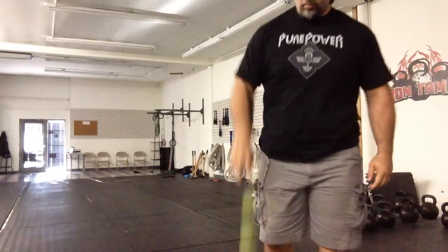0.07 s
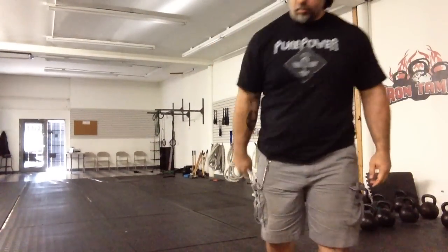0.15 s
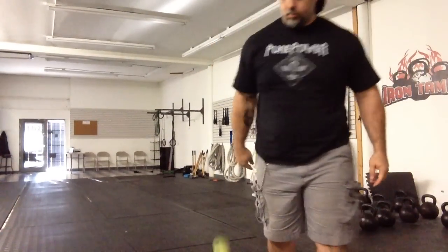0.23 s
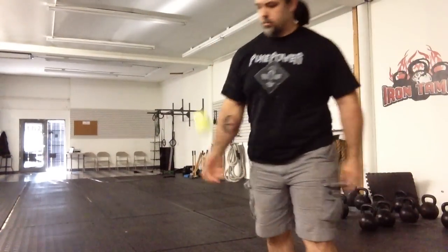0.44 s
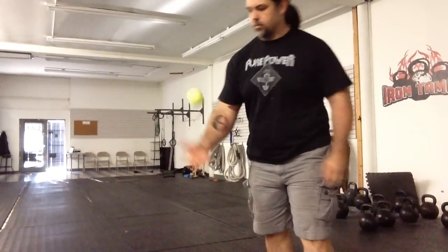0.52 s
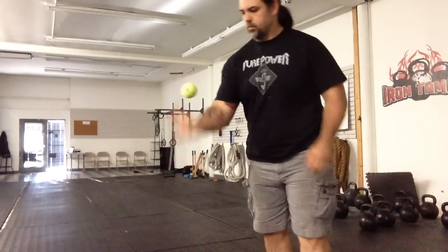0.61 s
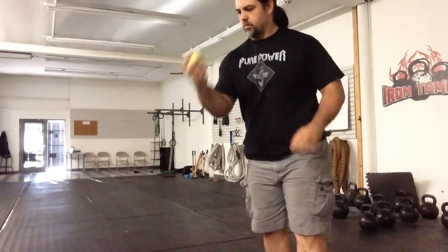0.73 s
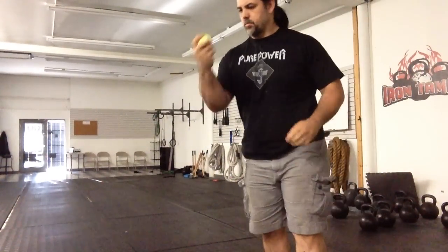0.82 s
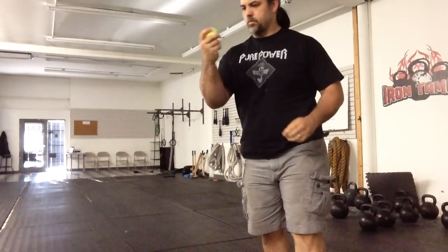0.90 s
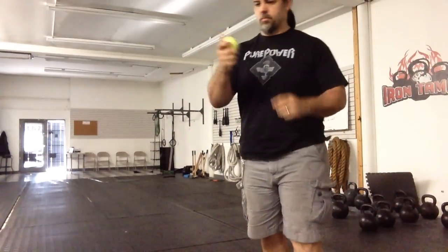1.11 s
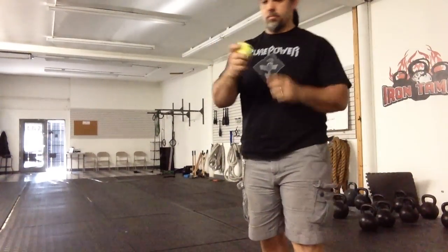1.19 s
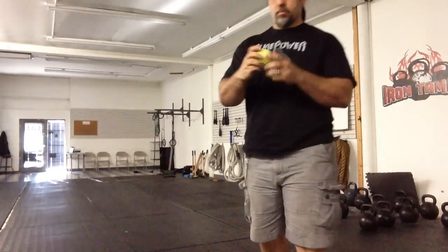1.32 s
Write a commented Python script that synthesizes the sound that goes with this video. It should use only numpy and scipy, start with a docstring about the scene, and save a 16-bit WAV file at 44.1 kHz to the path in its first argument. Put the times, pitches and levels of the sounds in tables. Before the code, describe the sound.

One sharp, hollow tennis ball bounce rings out in a gym, then a faint catch.

```python
"""A large, bare gym hums faintly. A sleeve swishes and a hand brushes a tennis ball, throwing it down.
After a faint tick the ball hits the rubber floor at 0.22 s: the felt slaps, the shell thumps and rings.
Near surfaces throw the bounce back, then the hall rings on, its treble dying first.
The sleeve swishes again, the ball taps the catching hand at 0.75 s, and a soft bump follows."""
import sys
import numpy as np
from scipy import signal
from scipy.fft import rfft, irfft
from scipy.io import wavfile
from scipy.ndimage import uniform_filter1d

SR = 44100
rng = np.random.default_rng(int(sys.argv[2]) if len(sys.argv) > 2 else 0)


def wav_record(signal):
    """Record a signal, one row per channel, as 16-bit PCM in the file named by sys.argv[1]."""
    frames = np.transpose(np.atleast_2d(signal))
    bounded = np.clip(frames, -1, 1)
    # unit amplitude maps onto the largest positive 16-bit level
    quanta = np.round(bounded * 32767).astype(np.int16)
    wavfile.write(sys.argv[1], SR, quanta)


N = 59535
T = np.arange(N) / SR
HZ = np.fft.rfftfreq(2 * N, 1 / SR)
BOUNCE_S = 0.2177


def amp(db):
    """Decibels to gain."""
    return 10 ** (np.asarray(db) / 20)


def unit_rms(x):
    """Scale to rms 1."""
    return x / np.sqrt(np.mean(x ** 2) + 1e-20)


def spectrum(points):
    """Interpolate (freq_hz, value) rows onto HZ, on a log-frequency axis."""
    freq_hz, value = np.transpose(points)
    return np.interp(np.log(HZ + 1), np.log(freq_hz + 1), value)


def noise(colour_db):
    """Steady coloured noise, rms 1."""
    return unit_rms(irfft(rfft(rng.standard_normal(2 * N)) * amp(colour_db))[:N])


def burst(start_s, level_db, colour_db, decay_s):
    """Noise with instant onset and exponential decay."""
    envelope = (T >= start_s) * np.exp(-np.maximum(T - start_s, 0) / decay_s)
    return amp(level_db) * noise(colour_db) * envelope


def ring(modes, age_s):
    """Decaying sines, struck at age 0."""
    t = np.maximum(age_s, 0)
    return sum(amp(db - 60 * t / t60_s) * np.sin(2 * np.pi * hz * t) for hz, db, t60_s in modes)


def click(colour_db):
    """Minimum-phase impulse: the sharpest causal click of this colour."""
    cepstrum = irfft(np.log(amp(colour_db)))
    cepstrum[1:N] *= 2
    cepstrum[N + 1:] = 0
    return irfft(np.exp(rfft(cepstrum)))[:N]


def delayed(x, delay_s, gain=1):
    """Delay with a gain per frequency."""
    return irfft(rfft(x, 2 * N) * gain * np.exp(-2j * np.pi * HZ * delay_s))[:N]


def room_tone():
    """Faint, steady hum of the room: bass-heavy noise."""
    # room noise spectrum: freq_hz, relative_db
    colour = [(20, 17.5), (45, 11.5), (65, 13), (90, 9), (115, 8.5), (160, -6.5), (350, -6), (750, -7.5),
              (1300, -17.5), (2100, -22), (3500, -32), (6000, -35), (10000, -35), (15000, -34)]
    return amp(-54) * noise(spectrum(colour))


def sleeve():
    """Cloth slides softly with each arm movement."""
    # arm movements: start_s, level_db, tilt_db_per_octave, rise_s, hold_s, release_s
    swishes = [(-.06, -72, -2, 0.037, 0.073, .04), (0.053, -66, 0.5, 0.033, .03, .03),
               (0.107, -68.5, 1.5, 0.049, 0.11, .03), (0.537, -63.5, -.5, 0.059, 0.14, 0.086)]
    # cloth friction spectrum: freq_hz, relative_db
    cloth = [(200, -25.5), (900, 8), (2200, 7.5), (4500, 3), (6500, 0.5), (10000, -0.5), (15000, -4)]
    sound = np.zeros(N)
    for start_s, level_db, tilt_db_per_octave, rise_s, hold_s, release_s in swishes:
        envelope = np.interp(T, start_s + np.cumsum([0, rise_s, hold_s, release_s]), [0, 1, 1, 0])
        colour_db = spectrum(cloth) + tilt_db_per_octave * np.log2(HZ + 1)
        sound += amp(level_db) * noise(colour_db) * envelope
    return sound


def ticks():
    """Hand on ball at throw and catch; a faint, dull tick just before the bounce; a late soft bump."""
    # short noise bursts: start_s, level_db, centre_hz, half_width_octaves, decay_s
    bursts = [(.096, -46.5, 2200, 0.4, 0.0015), (0.0993, -54, 2600, 0.86, 0.0018),
              (0.205, -42.5, 760, 0.71, 0.0049), (.7466, -46.5, 3700, 0.56, 0.0014),
              (.7472, -55, 11860, 0.39, .001), (1.2, -60.5, 357.6, 0.24, .012)]
    sound = np.zeros(N)
    for start_s, level_db, centre_hz, half_width_octaves, decay_s in bursts:
        offset = np.log2((HZ + 1) / centre_hz) / half_width_octaves
        band_db = -10 * np.log10(1 + offset ** 6)
        sound += burst(start_s, level_db, band_db, decay_s)
    return sound


def soft_reverb(x, wet_db=-6, t60_s=1.0, edge_hz=3600):
    """The dull tail that the hall gives to small sounds."""
    tail = noise(-10 * np.log10(1 + (HZ / edge_hz) ** 4)) * amp(-60 * T / t60_s)
    return amp(wet_db) * signal.fftconvolve(x, tail / np.linalg.norm(tail))[:N]


def ball(thump_db=-9, thump_lag_s=0.0003, thump_width_s=0.0003, slap_gain_db=-4.5):
    """Felt slaps the floor; the shell flattens, springs back and rings, short and hollow."""
    # spectrum of felt on rubber: freq_hz, level_db
    slap_colour = [(40, -20), (150, -4.5), (700, 11), (1800, -19.5), (2800, 9), (4400, 3), (5300, -4.5),
                   (6800, 5), (10000, 4.5), (12000, -3.5), (14500, -9), (16000, -33.5)]
    # modes of ball and floor mat: pitch_hz, level_db, t60_s
    modes = [(174, -24.5, 0.033), (288.5, -20.5, .025), (565, -19.5, 0.044), (743, -21, 0.029),
             (1052, -27, 0.023), (1289, -20.5, 0.016), (1480, -23, 0.017), (1910, -25, 0.018),
             (2620, -33, 0.014)]
    age_s = T - BOUNCE_S - thump_lag_s
    widths = age_s / thump_width_s
    thump = amp(thump_db) * widths * np.exp((1 - widths ** 2) / 2)
    slap = amp(slap_gain_db) * delayed(click(spectrum(slap_colour)), BOUNCE_S)
    return thump - slap + ring(modes, age_s)


def scatter(delay_s=0.002):
    """Floor and body scatter a short, diffuse spray right behind the bounce."""
    # scattered spectrum: freq_hz, relative_db
    colour = [(60, -8), (130, 1.5), (250, 5.5), (700, -9), (1400, -7), (1750, -1), (2300, -22.5),
              (4000, -23), (5300, -27.5), (6800, -19.5), (10000, -29.5), (15000, -34)]
    return burst(BOUNCE_S + delay_s, level_db=-25, colour_db=spectrum(colour), decay_s=0.0044)


def echoes(x, bass_edge_hz=220):
    """Near surfaces return the sound later and duller; being small, they return little bass."""
    # reflections of the bounce: arrival_s, gain_db, treble_edge_hz
    reflections = [(.2202, -12, 9000), (0.2216, -9, 1000), (.2290, -8.5, 8800), (.2345, -19.5, 6000),
                   (.2382, -17.5, 13950), (.2424, -10.5, 15000), (.2467, -19.5, 2217), (.2553, -22.5, 9000),
                   (0.2691, -23.5, 8980)]
    highpass = 1j * HZ / (1j * HZ + bass_edge_hz)
    return sum(delayed(x, arrival_s - BOUNCE_S, highpass * amp(gain_db) / np.hypot(1, HZ / edge_hz))
               for arrival_s, gain_db, edge_hz in reflections)


def hall_reflections(age_s, grain_db=6, mixing_s=0.12, echo_feed=0.34):
    """Single reflections stand out until the hall has mixed; near echoes feed it too."""
    sizes = amp(grain_db * np.exp(-age_s / mixing_s) * np.minimum(rng.exponential(1, N), 4))
    local_rms = np.sqrt(uniform_filter1d(sizes ** 2, size=1500))
    taps = rng.standard_normal(N) * sizes / local_rms
    return taps + echo_feed * echoes(taps)


def hall(wash_db=-26.5, delay_s=0.003946, build_s=0.0096):
    """Dense reflections build up and die away, treble first; a few tones stand out."""
    # reverberation bands: freq_hz, relative_db, t60_s
    bands = [(35, -38, .6), (66.1, -2, 1.1), (105, -15.5, 0.95), (170, -3, 1.2), (260, 3, 1.056),
             (403, -1, 1.01), (560, 3, 1.01), (800, -1, 1.394), (1136, -7, 1.473), (1900, -12.5, 1.243),
             (3100, -16.5, 0.88), (4300, -21.5, .85), (5294, -30, .75), (6500, -20.5, 0.64),
             (10000, -28.5, 0.59), (12500, -30, 0.37), (15500, -40.5, .33)]
    # prominent hall modes: pitch_hz, level_db, t60_s
    modes = [(210.1, -43, 1.0), (331, -41, 1), (542, -41, 1.2), (602, -46.5, 1.1), (707.5, -40.5, 0.88),
             (831, -48.5, 1.6), (894, -44, 1.32)]
    # swell and sag of the tail: time_s, gain_db
    swell = [(.22, -0.5), (.29, -0.5), (.36, -0.5), (.47, 1.5), (.55, 1), (.67, -1.5), (.8, 1.5),
             (1.0, 3.5), (1.35, 1)]
    freq_hz, relative_db, t60s_s = np.transpose(bands)
    age_s = np.maximum(T - BOUNCE_S - delay_s, 0)
    colour = amp(spectrum(np.c_[freq_hz, relative_db]))
    wash = unit_rms(delayed(hall_reflections(age_s), 0, colour))
    wash_bins = rfft(wash, 2 * N)
    tail = ring(modes, age_s)
    for share, t60_s in zip(np.eye(len(bands)), t60s_s):
        band = irfft(wash_bins * spectrum(np.c_[freq_hz, share]))[:N]
        tail += band * amp(wash_db - 60 * age_s / t60_s)
    build_up = 1 - np.exp(-age_s / build_s)
    return tail * build_up * amp(np.interp(T, *np.transpose(swell)))


def scene():
    """Room tone, small near sounds and one bounce with its reflections; mono."""
    near = sleeve() + ticks()
    bounce = ball()
    mix = room_tone() + near + soft_reverb(near) + bounce + scatter() + echoes(bounce) + hall()
    return mix[None]


def record(dry, low_cut_hz=106.7, band_limit_hz=15450):
    """Microphone low cut, then a steep band limit."""
    thinned = signal.lfilter(*signal.butter(2, low_cut_hz, "highpass", fs=SR), dry)
    lowpass = signal.firwin(401, band_limit_hz, window=("kaiser", 8), fs=SR)
    return signal.oaconvolve(thinned, lowpass[None], "same")


dry = scene()
out = record(dry)
wav_record(out)
```